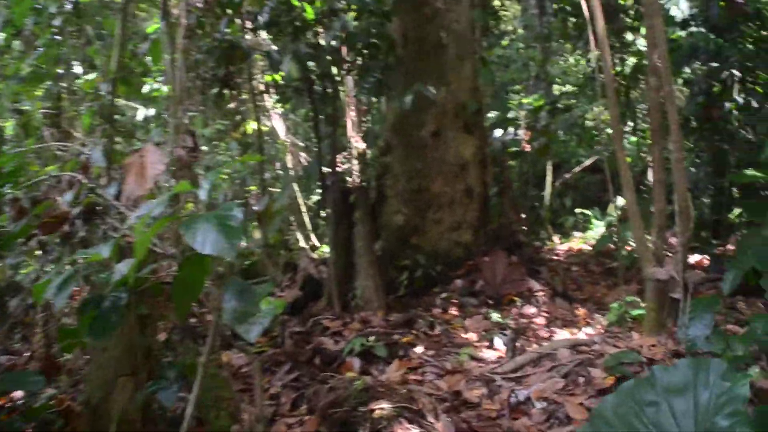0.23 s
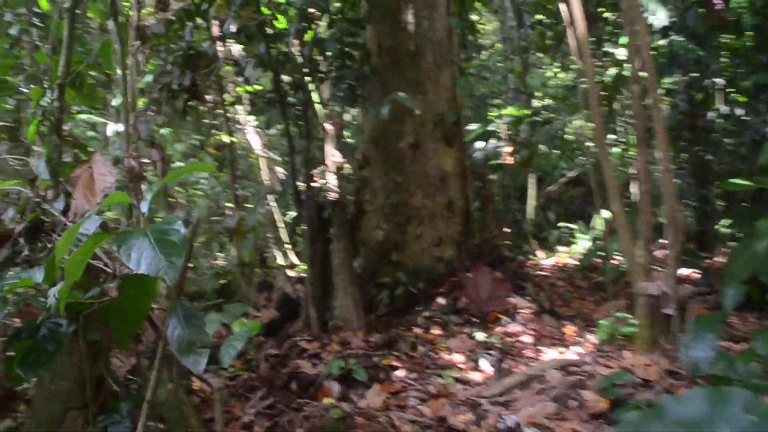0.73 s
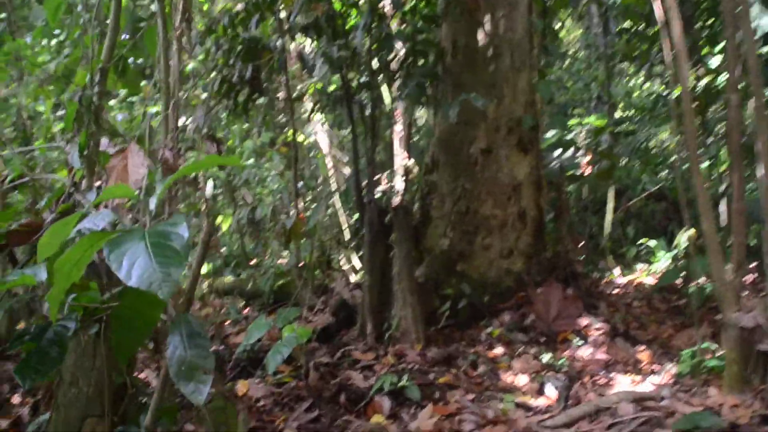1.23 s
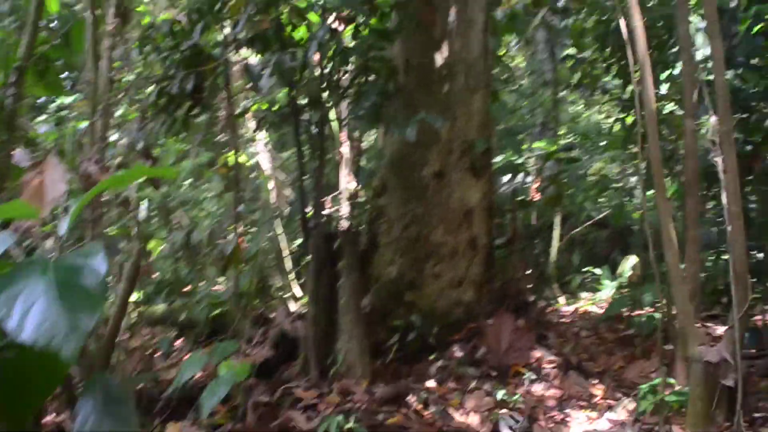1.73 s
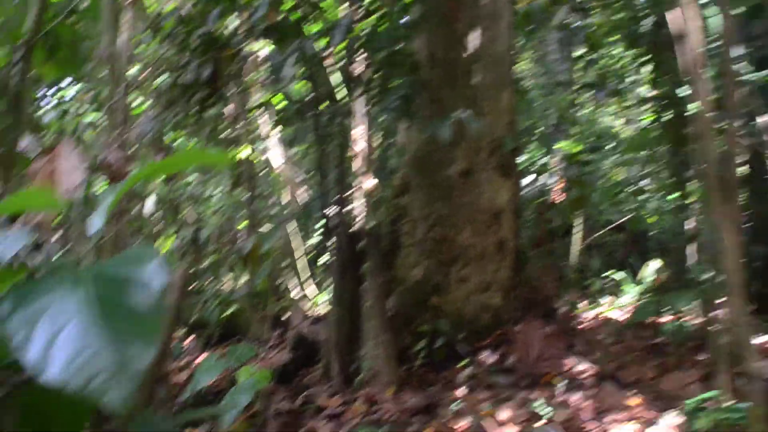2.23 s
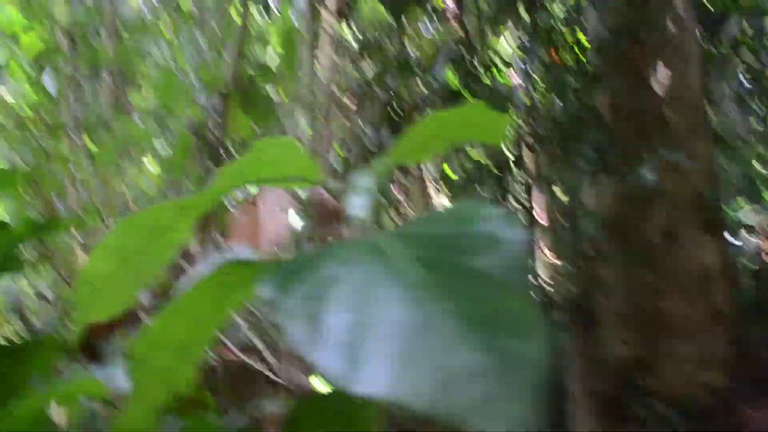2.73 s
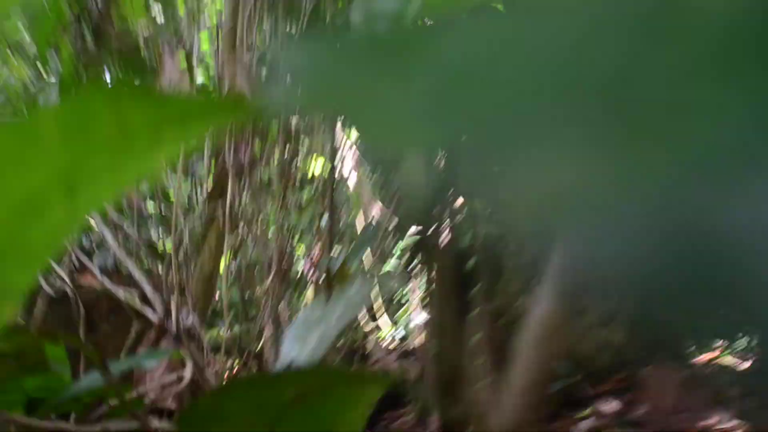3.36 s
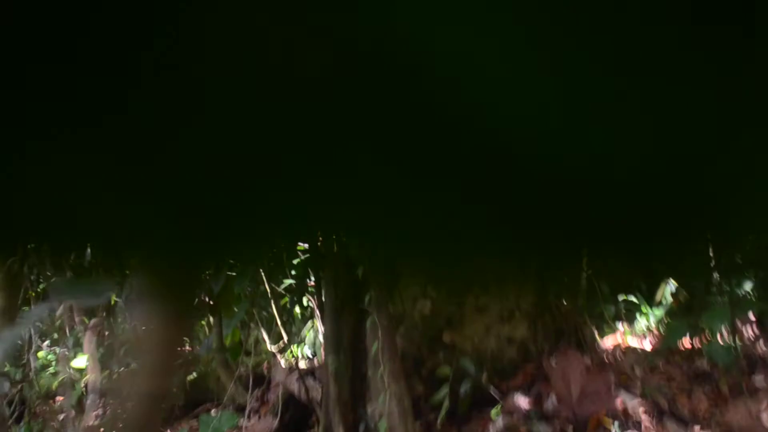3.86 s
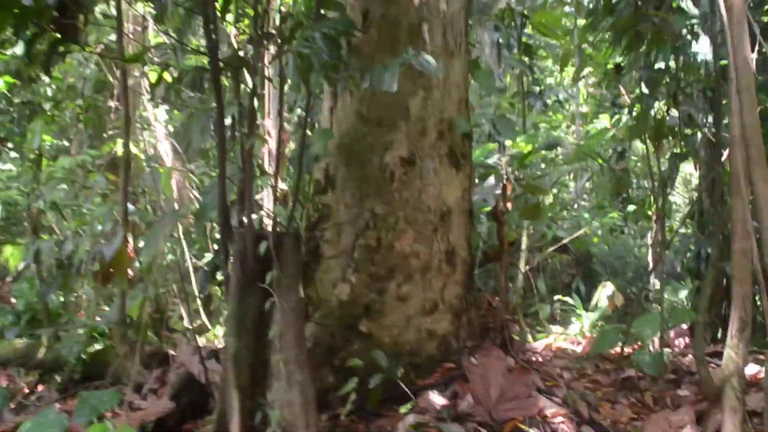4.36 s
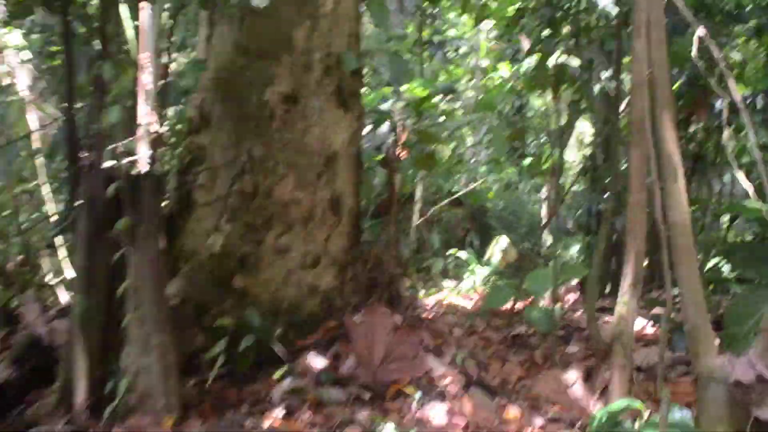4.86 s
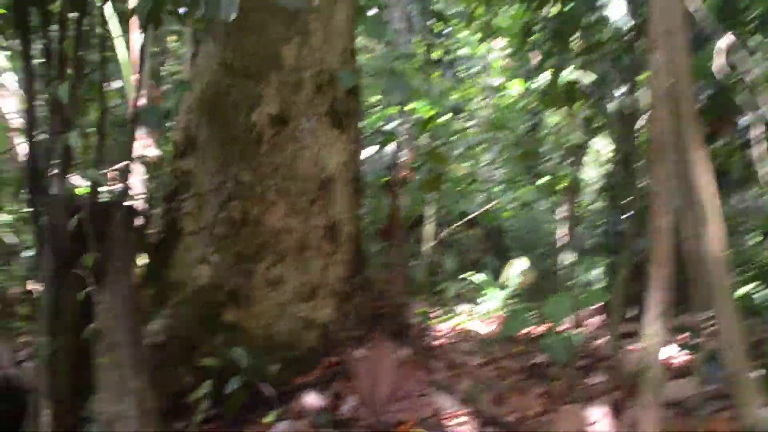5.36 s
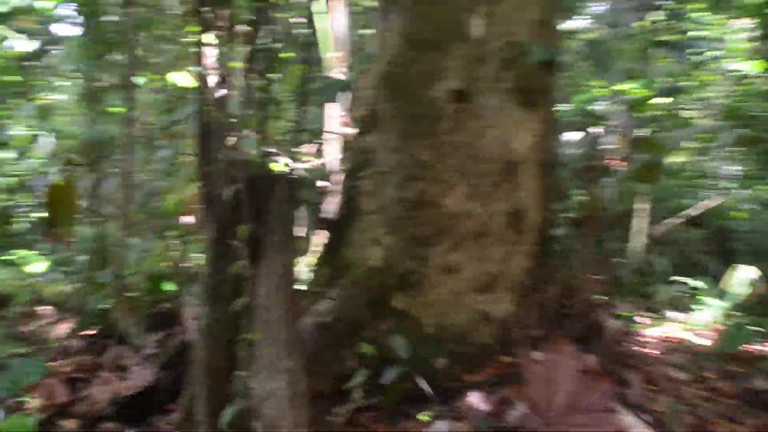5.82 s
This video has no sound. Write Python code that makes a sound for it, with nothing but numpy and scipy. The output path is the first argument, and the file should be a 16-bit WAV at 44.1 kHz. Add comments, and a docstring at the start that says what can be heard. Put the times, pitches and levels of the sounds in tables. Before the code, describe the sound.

A close cicada's shrill buzz takes over the second half of this quiet rainforest scene. Before it there is only a high hiss of distant insects, one faint wavering hoot, and leaves brushing and crunching as someone moves through the undergrowth. As the buzz builds, twigs and a big leaf strike the hand-held microphone in a loud clatter. The cicada keeps going and speeds up, with occasional cracks against the housing.

```python
"""A cicada in the rainforest.

Far insects hiss and a distant animal gives one wavering hoot. Someone pushes through the plants with
a hand-held camera: leaves crunch, twigs snap and knock on the housing. Close by, a cicada starts
clicking its tymbals (two tiny drum skins) and swells into a shrill buzz that keeps speeding up."""
import sys
import numpy as np
from scipy import signal
from scipy.fft import rfft, irfft
from scipy.io import wavfile
from scipy.ndimage import map_coordinates

SR = 44100
rng = np.random.default_rng(int(sys.argv[2]) if len(sys.argv) > 2 else 0)


def digitize_waveform(pressure):
    """Quantize a signal to 16-bit integers and store it at the path in sys.argv[1].

    Rows of a 2-D input are taken as channels; values are limited to [-1, 1].
    """
    field = np.atleast_2d(pressure).T
    bounded = np.clip(field, -1, 1)
    quanta = np.round(bounded * 32767).astype(np.int16)
    wavfile.write(sys.argv[1], SR, quanta)


N = 268569
TIME = np.arange(N) / SR
SONG_START_S = 3.245


def cicada(song_db=-13, start_drop_db=15.5, hurry_loss_db=2.2, leaf_loss_db=6):
    """Clicks ring the insect's body. The song swells with effort; the clicks weaken as they hurry."""
    hurry = np.exp(np.minimum(TIME - 6.09, 0) / .6)  # grows from 0 to 1
    clicks_per_s = 305 + 140 * hurry
    song = abdomen(tymbals(clicks_per_s, hurry), clicks_per_s)
    song = second_pulse(song + from_db(-3.5) * trees(song))
    slack = settling(SONG_START_S, settle_s=.28)
    leaf_cover = swell(4.0, rise_s=.19, fall_s=.03)  # a large leaf covers the microphone, then slips off
    level_db = song_db - start_drop_db * slack - hurry_loss_db * hurry - leaf_loss_db * leaf_cover
    singing_share = np.mean(TIME > SONG_START_S)
    return rms_one(song) * np.sqrt(singing_share) * from_db(level_db)


def tymbals(rate, hurry, jitter_ms=.077, steady_limp=.02, hurried_limp=.173, rib_decay_s=.0021):
    """Two drum skins buckle in turn, each with a click and a crackle of its stiff ribs."""
    beats = np.cumsum(rate * (TIME > SONG_START_S)) / SR
    index = np.arange(1, int(beats[-1]))
    at = np.searchsorted(beats, index)
    # hurrying makes the pair limp: gaps are long and short in turn, by this share of a beat
    limp = steady_limp + (hurried_limp - steady_limp) * hurry[at]
    limp_s = (-1) ** index * limp / rate[at] / 2
    crackle = rng.standard_normal(N)
    jitter, uneven_db, wander = rng.standard_normal((len(at), 3)).T
    # the muscles fire a little early or late, and a late beat delays the next ones
    late_ms = jitter_ms * jitter + .0484 * linger(wander, steps=10)
    buckling = clicks(at / SR + limp_s + late_ms / 1000, from_db(uneven_db))
    ribs = linger(buckling, rib_decay_s * SR) * crackle
    return rms_one(buckling) + from_db(-10) * rms_one(cut(ribs, 5500, "high"))


# tones of the tymbals and belly: f/Hz at 330 clicks a second, width/Hz, level/dB,
# shift/Hz for each extra click a second
BODY_TONES = [(3404, 336, -6, -1.5), (4224, 626, 1.5, 0.5), (4733, 810, -3, 1.3), (4900, 235, -11.5, 0.5),
              (6450, 690, -12.5, 0.2), (7160, 285, -11, -1.8), (9320, 2400, -20.5, -1),
              (10220, 730, -19.5, -5.5), (11400, 1500, -36.5, -7), (13300, 690, -30.5, -8)]
# how bright the song is as the microphone turns: t/s, tilt/dB per octave
BRIGHTNESS = [(3.25, 1), (3.8, 1), (4.3, 0.7), (4.8, -1.5), (5.2, -2.5), (5.55, -1), (6.09, -3)]

def abdomen(drive, rate, flutter_db=.7, waver=.0075):
    """The clicks ring the cicada's flexing belly, whose tones slide as the clicks speed up."""
    tilt, = in_time(BRIGHTNESS)
    song = 0
    for k, (hz, width, db, shift) in enumerate(BODY_TONES):
        centre_hz = (hz + shift * (rate - 330)) * (1 + waver * drift(25))
        gain = from_db(db + tilt * np.log2(hz / 4300) + flutter_db * drift(45))
        # the two lowest tones swing together, leaving a deep gap between them; the others alternate
        sign = (-1) ** max(k, 1)
        song = song + sign * gain * glide_resonate(drive, centre_hz, width)
    return cut(cut(song, 3215, "high", order=5), 12060, "low", order=3)


# the quick second pulse of each click: t/s, lag/ms, strength
SECOND_PULSE = [(3.25, 1.39, .15), (3.72, 1.337, .55), (4.0, 1.318, .55), (5.15, 1.322, .57),
                (5.65, 1.368, .55), (5.84, 1.435, .47), (6.09, 1.68, .33)]

def second_pulse(song, middle_dip=.81):
    """Each click has a quick, upside-down second pulse; its changing lag bends ripples in the buzz."""
    lag_ms, strength = in_time(SECOND_PULSE)
    pulse = song - middle_dip * resonate(song, 4700, 1500)  # weaker in its middle pitches
    delayed = map_coordinates(pulse, [np.arange(N) - lag_ms * SR / 1000], order=3)
    return song - strength * delayed


# branches brushing past: loudest t/s, level/dB, rise/s, fall/s
BRANCHES = [(2.5, -37, .07, 0.089), (2.69, -33.5, 0.082, .04), (3.3, -30.5, 0.12, 0.086),
            (3.94, -30, 0.22, .12), (4.4, -43.5, .15, .08), (4.8, -37, 0.24, .09), (5.28, -40, 0.32, 0.13)]
# leaves crushed or pushed aside: t/s, crackle level/dB, rustle level/dB, decay/s
LEAF_PUSHES = [(2.417, -54, -31.5, .02), (2.516, -37, -34, .013), (2.702, -17, -40, 0.0096),
               (2.722, -33, -18, 0.0094), (2.731, -27, -30.5, .055), (2.817, -34, -57, .015),
               (2.881, -55, -30.5, 0.012), (3.028, -31, -52, 0.013), (3.126, -35, -48, 0.0085),
               (3.185, -52, -38, .023), (3.231, -17.5, -27, .013), (3.388, -41, -25, 0.013),
               (3.972, -24, -15, 0.0065), (4.011, -29, -9.5, 0.0097), (4.52, -25, -27, 0.0072),
               (5.18, -50, -40, .017)]
# tone colour of the soft rustle: f/Hz, level/dB
RUSTLE_COLOUR = [(80, -28), (200, -8.5), (370, -2.5), (750, -2.5), (1300, -5.5), (2600, -5), (5000, -13),
                 (9000, -21.5), (15000, -45)]
# tone colour of the dry crackle: f/Hz, level/dB
CRACKLE_COLOUR = [(300, -23), (800, -16), (2000, 10), (3500, 9.5), (8000, 6.5), (11000, -3.5), (15000, -34)]

def leaves(uneven_db=2.5, rise_s=.0014):
    """Leaves slide past in countless tiny ticks; each push gives a soft rustle and a dry crackle."""
    brushing = np.max([from_db(db) * swell(s, rise, fall) for s, db, rise, fall in BRANCHES], axis=0)
    rustle = brushing * from_db(uneven_db * drift(70))
    crackle = np.zeros(N)
    t = TIME[:SR // 4]
    for s, crackle_db, rustle_db, decay_s in LEAF_PUSHES:
        push = np.exp(-t / decay_s) * (1 - np.exp(-t / rise_s))
        add(crackle, s, from_db(crackle_db) * push)
        add(rustle, s, from_db(rustle_db) * push)
    sliding, cracking = grains(per_s=6000), grains(per_s=16000)
    return rustle * coloured(sliding, RUSTLE_COLOUR) + crackle * coloured(cracking, CRACKLE_COLOUR)


# knocks on the housing: twig hits, the body ring of a crushed leaf at 3.237 s and the rebound of the large
# leaf's slap at 4.032 s: t/s, crack level/dB, crack f/Hz, crack width/Hz, thud level/dB
HOUSING_HITS = [(2.517, -25, 2800, 3000, -18.5), (3.097, -17, 3200, 1300, -52), (3.237, -21.5, 376, 130, -21),
                (3.975, -10, 2420, 2500, -16), (4.0084, -5, 1800, 3000, -4), (4.02, -3, 2310, 3000, -14),
                (4.032, -5, 1190, 1200, -8), (4.088, -33, 900, 900, -11), (4.121, -7.5, 1850, 950, -17),
                (5.349, -3.5, 1790, 955, -20.5), (5.499, -39, 1510, 1500, -20), (5.89, -21, 1060, 300, -25.5),
                (5.974, -6, 2000, 850, -50)]
# tones of a snapping twig: f/Hz, width/Hz, level/dB
TWIG_TONES = [(396, 330, -15), (1060, 260, -12), (2040, 570, -4.5), (3200, 2000, -20)]
# tones of the housing when the large leaf slaps it: f/Hz, width/Hz, level/dB
HOUSING_TONES = [(169, 256, -7), (800, 950, -2), (1300, 1100, -4), (3400, 1400, 9)]

def knocks(thud_hz=473, snap_s=2.7312, slap_s=4.03):
    """Twigs and leaves hit the housing with a crack and a dull thud; one twig snaps and a large leaf slaps."""
    out = np.zeros(N)
    ring = resonate(signal.unit_impulse(SR // 10), thud_hz, .8 * thud_hz)
    thud = cut(ring, 3 * thud_hz, "low")
    thud /= np.abs(thud).max()
    for s, crack_db, hz, width_hz, thud_db in HOUSING_HITS:
        add(out, s, crack(hz, width_hz, crack_db) + from_db(thud_db) * thud)
    for s, tones in (snap_s, TWIG_TONES), (slap_s, HOUSING_TONES):
        add(out, s, sum(crack(*tone) for tone in tones))
    return out + from_db(-15) * trees(out)


def crack(hz, width_hz, db):
    """A struck thing rings very briefly, peaking at db."""
    ring = resonate(signal.unit_impulse(SR // 10), hz, width_hz)
    ring = resonate(ring, hz, width_hz)
    return from_db(db) * ring / np.abs(ring).max()


# puffs of air on the microphone: t/s, level/dB
AIR_PUFFS = [(.8, -38.5), (.87, -45), (4.035, -23.5)]

def air_rumble():
    """Air gives a low, lumpy rumble as the microphone is moved and bumped."""
    rumble = cut(cut(rng.standard_normal(N), 150, "low"), 48, "high", order=3)
    return rms_one(rumble) * sum(from_db(db) * swell(s, .038, .038) for s, db in AIR_PUFFS)


def hoot(start_s=.92, rise_s=.24, hold_s=.19, start_hz=622, note_hz=955, waver=.018):
    """A far animal slides up to a nearly pure note, holds it and fades; the trees blur the call."""
    hz = note_hz + (start_hz - note_hz) * settling(start_s, settle_s=.085)
    fade_in = np.clip((TIME - start_s) / rise_s, 0, 1)
    fade_out = settling(start_s + rise_s + hold_s, settle_s=.06)
    phase = 2 * np.pi * np.cumsum(hz * (1 + waver * drift(60))) / SR
    tone = np.sin(phase) + from_db(-8) * np.sin(2 * phase)
    call = np.sqrt(2) * from_db(-44.5) * fade_in * fade_out * tone
    return from_db(-5) * call + from_db(-3) * trees(call)


# tone colour of the high hiss: f/Hz, level/dB
HISS_COLOUR = [(2700, -19), (3300, -5.5), (3750, 1), (4150, -2), (4700, 2.5), (5300, -2), (6400, -7),
               (7400, -8), (8300, -12), (10600, -16), (12000, -27.5), (14500, -41)]
# level of the high hiss, which swells around the cicada's buzz at the end: t/s, level/dB
HISS_LEVEL = [(0, -35.5), (.36, -35.5), (.58, -40), (1.4, -40), (2.3, -41), (3.2, -44), (6.09, -26.5)]

def high_hiss(flutter_db=.5):
    """Countless far insects merge into a hiss. At the end, hiss also swells around the near buzz."""
    hiss = coloured(rng.standard_normal(N), HISS_COLOUR)
    level_db, = in_time(HISS_LEVEL)
    return hiss * from_db(level_db + flutter_db * drift(90))


# tone colour of the forest's wash: f/Hz, level/dB
WASH_COLOUR = [(15, -45), (25, -15), (59, -8), (92, -11.5), (152, 0.5), (198, -7.5), (298, -2), (475, -1),
               (644, 0.5), (966, -0.5), (1050, 0), (1570, -1), (2410, -4.5), (3200, -5.5), (4160, -7.5),
               (7040, -120)]
# the background is turned down as the cicada grows loud: t/s, added level/dB
BACKGROUND_GAIN = [(0, 0.25), (2.3, 1), (4.3, 1.5), (6.09, -5.5)]

def forest_wash(base_db=-41):
    """A soft, even noise of the forest lies under everything."""
    gain_db, = in_time(BACKGROUND_GAIN)
    return from_db(base_db + gain_db) * coloured(rng.standard_normal(N), WASH_COLOUR)


def trees(x, echo_s=.35):
    """Trunks and leaves scatter an echo whose pattern keeps changing as the listener moves."""
    out, t, hop = np.zeros(N), TIME[:SR // 3], SR // 8
    padded, fade = np.pad(x, (hop, 2 * hop)), signal.get_window("hann", 2 * hop)
    for at in range(0, N, hop):
        scatter = rng.standard_normal(len(t)) * from_db(-60 * t / echo_s) * (t > .004)
        echo = signal.fftconvolve(padded[at:at + 2 * hop] * fade, scatter / np.linalg.norm(scatter))
        add(out, max(at - hop, 0) / SR, echo[max(hop - at, 0):])
    return out


def from_db(db):
    """Turn decibels into a gain."""
    return 10 ** (np.asarray(db) / 20)


def rms_one(x):
    """Scale to an average power of 1."""
    return x / np.sqrt(np.mean(x ** 2) + 1e-20)


def in_time(rows):
    """Join a table's points with lines: one curve for each column after the time."""
    s, *columns = np.transpose(rows)
    return [np.interp(TIME, s, c) for c in columns]


def drift(per_s):
    """A random wobble with a spread of 1."""
    knots = rng.standard_normal(4000)
    return rms_one(np.interp(TIME * per_s, np.arange(len(knots)), knots))


def swell(s, rise_s, fall_s):
    """A gain that grows to 1 at time s and dies away again."""
    return np.exp(np.minimum((TIME - s) / rise_s, (s - TIME) / fall_s))


def settling(start_s, settle_s):
    """The share of a change still to come: 1 at the start, then towards 0."""
    return np.exp(-np.maximum(TIME - start_s, 0) / settle_s)


def linger(x, steps):
    """Give each value a fading tail."""
    return signal.lfilter([1], [1, -np.exp(-1 / steps)], x)


def coloured(x, colour):
    """Give a sound a tone colour, held level beyond the table's ends; power 1."""
    hz, db = np.transpose(colour)
    log_f = np.log(np.arange(N // 2 + 1) * SR / N + 1)
    gain = from_db(np.interp(log_f, np.log(hz), db))
    beyond = np.maximum(log_f - np.log(hz[-1]), 0) + np.maximum(np.log(hz[0]) - log_f, 0)
    return rms_one(irfft(rfft(x) * gain, N))


def resonate(x, hz, width_hz):
    """Ring at one pitch, with gain 1 there."""
    r = np.exp(-np.pi * width_hz / SR)
    feedback = [1, -2 * r * np.cos(2 * np.pi * hz / SR), r * r]
    return signal.lfilter(np.array([1, 0, -1]) * (1 - r * r) / 2, feedback, x + 1e-18)


def glide_resonate(x, hz, width_hz):
    """Ring at a moving pitch, with gain 1 there."""
    r = np.exp(-np.pi * width_hz / SR)
    turn = np.exp(2j * np.pi * np.cumsum(hz) / SR)
    ring = turn * signal.lfilter([1], [1, -r], x / turn + 1e-18)
    return (1 - r) * (2 * np.real(ring) - x)


def cut(x, hz, kind, order=2):
    """Keep the "high" or the "low" side of hz."""
    return signal.sosfilt(signal.butter(order, hz, kind, fs=SR, output="sos"), x)


def clicks(times, sizes):
    """Clicks at times that may fall between samples."""
    whole, part = np.divmod(np.clip(times * SR, 0, N), 1)
    whole = whole.astype(int)
    before = np.bincount(whole, sizes * (1 - part), N + 2)
    after = np.bincount(whole + 1, sizes * part, N + 2)
    return (before + after)[:N]


def grains(per_s, spread_db=2.2):
    """Tiny random breaks of uneven size."""
    sizes = from_db(spread_db * np.minimum(rng.exponential(1, N), 4)) * rng.standard_normal(N)
    return sizes * (rng.random(N) < per_s / SR)


def add(out, s, sound):
    """Mix a short sound in at time s."""
    at = int(s * SR)
    out[at:at + len(sound)] += sound[:N - at]


def scene():
    """Everything reaches one microphone, alike in both channels."""
    mono = cicada() + high_hiss() + forest_wash() + hoot() + leaves() + knocks() + air_rumble()
    return np.stack([mono, mono])


# pitches weakened by the microphone's opening: f/Hz, width/Hz
OPENING_DIPS = [(5700, 590), (6900, 71)]

def record(dry, top_hz=15700):
    """The opening dents the treble and sheds deep bass; the hardest knock overloads; the top is cut."""
    for hz, width_hz in OPENING_DIPS:
        dry = dry - .8 * resonate(dry, hz, width_hz)
    clipped = np.clip(cut(dry, 36, "high"), -1, 1)
    return signal.sosfilt(signal.ellip(10, .1, 80, top_hz, fs=SR, output="sos"), clipped)


dry = scene()
out = record(dry)
digitize_waveform(out)
```